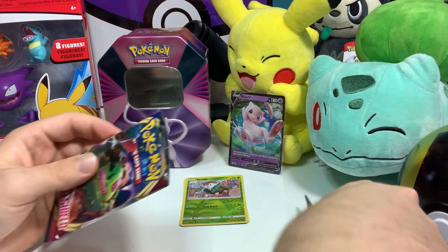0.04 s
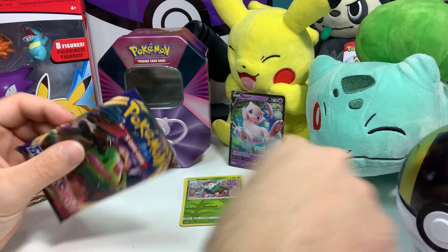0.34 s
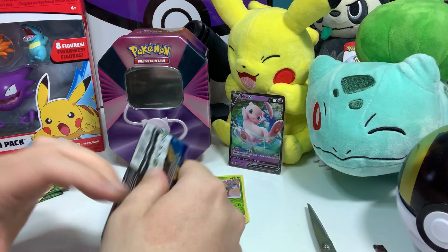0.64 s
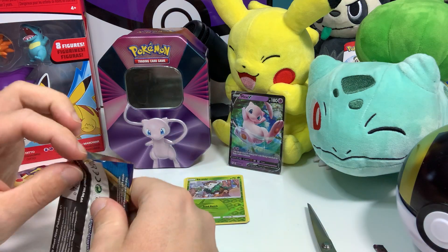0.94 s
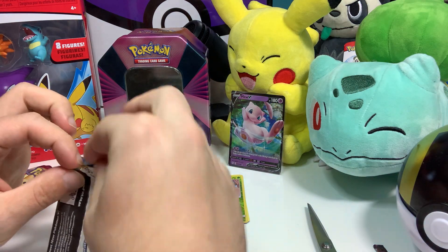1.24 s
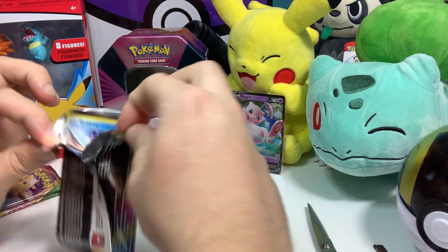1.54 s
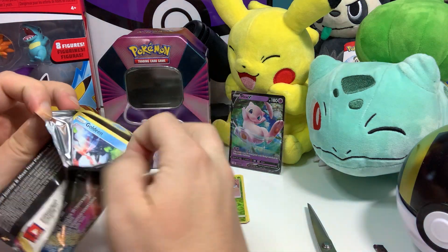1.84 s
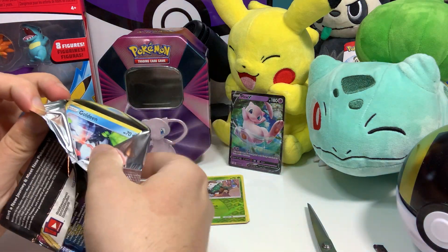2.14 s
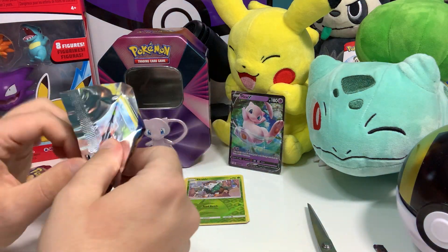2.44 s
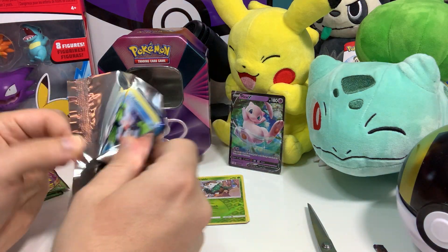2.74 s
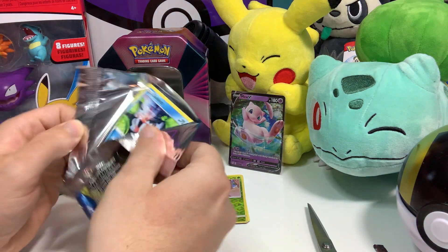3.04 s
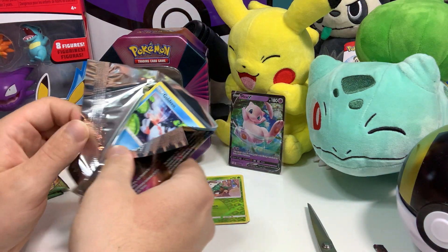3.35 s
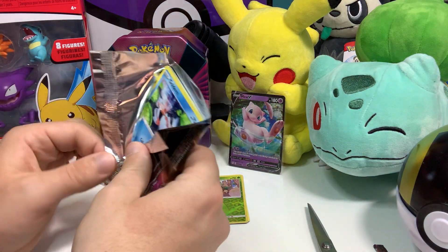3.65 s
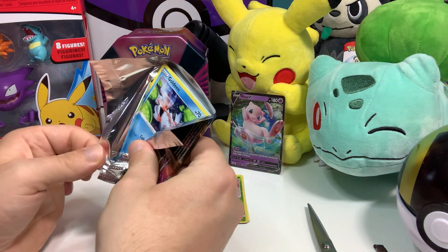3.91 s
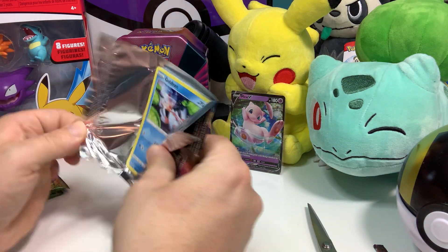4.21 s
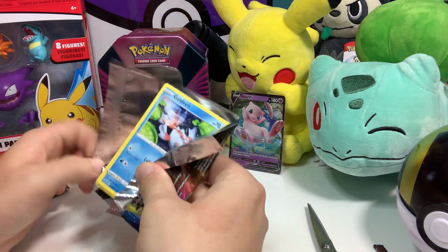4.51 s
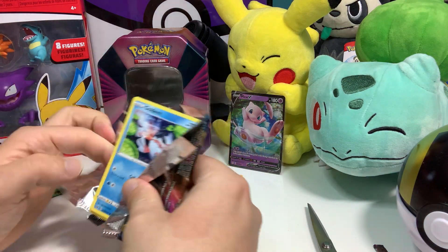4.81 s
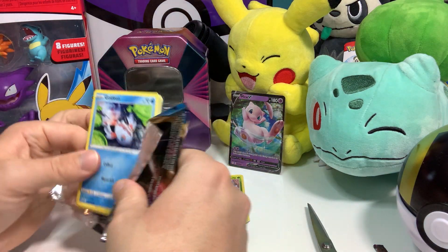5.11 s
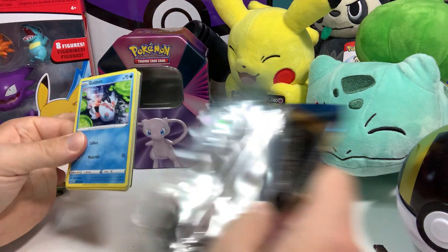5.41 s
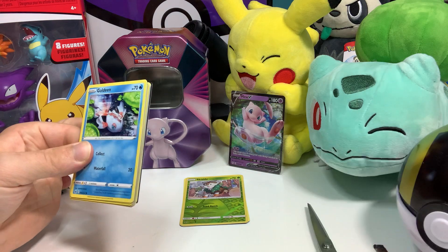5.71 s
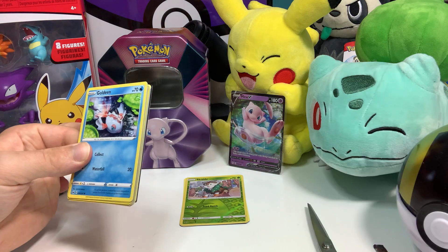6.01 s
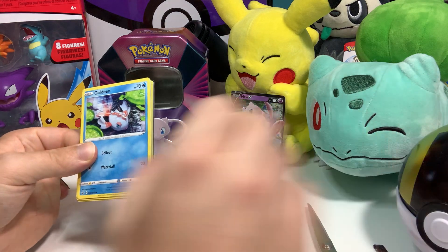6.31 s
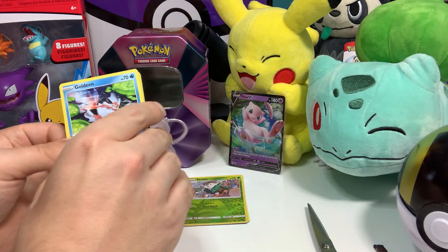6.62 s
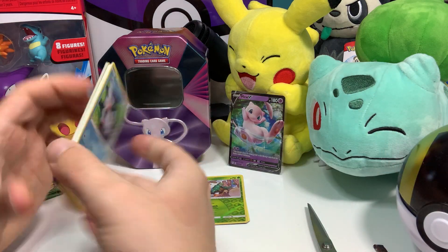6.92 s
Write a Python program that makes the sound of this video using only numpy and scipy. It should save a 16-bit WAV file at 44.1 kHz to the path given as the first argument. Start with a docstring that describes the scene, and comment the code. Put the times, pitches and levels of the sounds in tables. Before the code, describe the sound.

Scissors clatter briefly onto a table. Close to the microphone, fingers rub a foil card pack and pull it open in uneven bursts of bright crinkling, with sharp snaps, hollow pops and a few short rips. The crackle thins out as the cards slide from the wrapper and tap faintly together in the hand. A low hum and faint hiss fill the small room.

```python
"""Over a low hum and faint hiss, scissors clatter onto a table; then hands open a foil card pack up close.
Fingers rub the wrapper and each pull strains it into crackle: creases snap, panels buckle with a
hollow pop and the seam rips in short runs. The cards slide out and tap together in the hand.
A small room answers, most audibly on the scissors."""
import sys
import numpy as np
from scipy import signal
from scipy.fft import rfft, irfft, next_fast_len
from scipy.io import wavfile
from scipy.ndimage import uniform_filter1d, map_coordinates

SR = 44100
rng = np.random.default_rng(int(sys.argv[2]) if len(sys.argv) > 2 else 0)


def wrap_up_sound(samples):
    """Save the sound to the file named by the first command line argument, as 16-bit audio."""
    columns = np.atleast_2d(samples).T
    # keep every value between -1 and 1, then stretch to whole-number steps
    tamed = np.clip(columns, -1, 1)
    steps = np.round(tamed * 32767).astype(np.int16)
    wavfile.write(sys.argv[1], SR, steps)


N = 311346

# papery tone of the flexing foil sheet: freq_hz, gain_db
SHEET_EQ = [(100, -30), (280, -10), (550, -4), (820, -0.5), (1450, -12.5), (2300, -6), (4000, -25.5)]


def amp(db):
    """Decibels to gain."""
    return 10 ** (np.asarray(db) / 20)


def unit(x):
    """Scale to rms 1."""
    return x / np.sqrt(np.mean(x ** 2) + 1e-20)


def along(points, hz):
    """Read a curve of (freq_hz, value) points on a log frequency axis."""
    freqs, values = np.transpose(points)
    return np.interp(np.log(hz + 1), np.log(freqs), values)


def tilt(hz, bright_db):
    """Tilt EQ in dB, pivoting at 7 kHz."""
    return bright_db * np.log(np.clip(hz, 2000, 13000) / 7000)


def wobble(size, count):
    """A smooth random curve of size points with about count knots."""
    knots = rng.standard_normal(count + 1)
    fine = map_coordinates(knots, [np.linspace(0, count, 10 * count)], mode="nearest")
    return np.interp(np.linspace(0, len(fine) - 1, size), np.arange(len(fine)), fine)


def coloured(x, gain_db, size=2048):
    """Minimum-phase EQ; gain_db is a function of frequency."""
    cepstrum = irfft(np.log(amp(gain_db(np.fft.rfftfreq(size, 1 / SR)))))
    cepstrum[1:size // 2] *= 2
    cepstrum[size // 2 + 1:] = 0
    return signal.oaconvolve(x, irfft(np.exp(rfft(cepstrum))))[:len(x)]


def evened(burst, size=2048, count=60):
    """Fill a burst's broad spectral holes so that it cracks across the whole band."""
    power = uniform_filter1d(np.abs(rfft(burst, size)) ** 2, count)
    return coloured(burst, lambda hz: -10 * np.log10(np.abs(power) + 1e-20), size=size)


def add(track, start_s, sound):
    """Mix a sound into the track at start_s."""
    rest = track[round(start_s * SR):]
    rest[:len(sound)] += sound[:len(rest)]


def stick_slip(rate, spread_db, release_ms):
    """Envelope of rms 1: the foil catches and lets go unevenly, about rate times a second."""
    turns = np.cumsum(rng.gamma(4, 1 / 4, N // 20))
    slips = np.searchsorted(np.cumsum(rate) / SR, turns)
    slips = slips[slips < N]
    strength = amp(spread_db * np.clip(rng.standard_normal(len(slips)), -2, 2))
    energy = np.zeros(N)
    energy[slips] = strength ** 2 / rate[slips]
    fade = np.exp(-2000 / (release_ms * SR))
    return unit(np.sqrt(signal.lfilter([1], [1, -fade], energy)))


def pull(start, end, attack_s=.012, release_s=.012):
    """Strain of one pull: it builds, holds and dies away once the fingers ease off."""
    strain = np.zeros(N)
    t = start + np.arange(round((end - start) * SR) + SR // 5) / SR
    attack = np.clip((t - start) / attack_s, 0, 1)
    release = np.exp(-np.maximum(t - end, 0) / release_s)
    add(strain, start, attack * release)
    return strain


def room_tone(air_db=-64.5, waver_db=1):
    """A bed of steady room noise and the slightly wavering hum of an appliance."""
    # rumble and hiss of the room: freq_hz, gain_db
    air_eq = [(20, -1), (50, 5), (75, -1), (160, -4), (330, -7), (450, -11), (560, -0.5), (750, -13),
              (1300, -18.5), (2500, -24), (6000, -26.5), (11000, -23), (16000, -29.5)]
    # hum partials: pitch_hz, level_db
    partials = [(54, -75), (93, -73), (119.7, -66.5)]
    t = np.arange(N) / SR
    hum = np.zeros(N)
    for hz, db in partials:
        peak = np.sqrt(2) * amp(db + waver_db * wobble(N, count=30))
        hum += peak * np.sin(2 * np.pi * hz * t + .3 * wobble(N, count=20))
    air = unit(coloured(rng.standard_normal(N), lambda hz: along(air_eq, hz), size=8192))
    return hum + amp(air_db) * air


def scissors(knock_t60=0.081, clack_t60=0.016, resonance_db=5, rise_s=0.00077):
    """Each contact knocks the table top and makes the loose blades clack."""
    # the scissors land and rock: start_s, knock_db, clack_db
    contacts = [(0.193, -30.5, -25.5), (0.1976, -30.5, -27.5), (0.222, -30, -65), (.245, -38.5, -68),
                (0.325, -38, -61), (0.331, -25.5, -47.5), (0.354, -30, -56), (0.37, -37, -70),
                (.398, -30.5, -66), (.412, -34, -59), (0.428, -36.5, -67)]
    # table top resonances: pitch_hz, half_width_hz, prominence_db
    modes = [(551, 25, 18), (717, 18, 8), (850, 66, 13), (1210, 55, 9), (1580, 25, 0), (3000, 200, -1)]
    # body of the knock: freq_hz, gain_db
    knock_eq = [(70, -18), (170, -8.5), (400, -2), (880, -3), (1450, -9), (1900, -15), (3200, -22.5),
                (4600, -35), (10000, -46)]
    # steel clack of the blades: freq_hz, gain_db
    steel_eq = [(400, -18), (1400, 7.5), (3200, -0.5), (3950, 7), (4900, -3.5), (9000, 6), (13000, -2),
                (16000, -20)]
    t = np.arange(SR // 4) / SR
    track = np.zeros(N)
    peaks = lambda hz: sum(amp(db / 2) / (1 + ((hz - f) / width) ** 2) for f, width, db in modes)
    wood = lambda hz: along(knock_eq, hz) + resonance_db * peaks(hz)
    blow = amp(-60 * t / knock_t60) * (1 - np.exp(-t / rise_s))
    for start, knock_db, clack_db in contacts:
        knock = unit(coloured(rng.standard_normal(len(t)), wood))
        clack = unit(coloured(rng.standard_normal(len(t)), lambda hz: along(steel_eq, hz)))
        add(track, start, knock * amp(knock_db) * blow + clack * amp(clack_db - 60 * t / clack_t60))
    return track


def snaps(trim_db=-6, ring_db=-20, ring_s=.004, neutral_bright_db=5, size_spread=.09):
    """A crease gives way in a run of tiny slips; the facet around it rings briefly."""
    # creases and card edges snapping through: start_s, level_db, brightness_db, decay_ms
    hits = [(.564, -58.5, -1, 2.4), (0.6689, -44, 9, 2), (.8098, -53.5, 3, 0.56), (0.9973, -49, 7, 0.49),
            (1.0312, -50.5, -3.5, 0.33), (1.447, -46.5, 7, 1.1), (1.4771, -42.5, 1, 1.2),
            (1.49, -38.5, 11, 1.3), (1.5082, -25.5, 11, 0.61), (1.5236, -35, 11, 0.54),
            (1.5524, -31.5, 2, 0.34), (1.6593, -33.5, 10, 1.7), (1.6842, -31.5, 9.5, 2.1),
            (1.6918, -36, -2.5, 1.2), (1.7016, -33, 23, 1.7), (1.7555, -48, 17, 0.53),
            (1.7925, -39, 4, 0.69), (1.8051, -37, 29, .5), (1.9019, -39, 5, 1), (1.9748, -44, 5.5, 0.46),
            (2.0265, -43.5, 3, 14), (2.0492, -28.5, 5, 0.6), (2.29, -41.5, 9, 0.66),
            (2.3326, -40, 11, 0.28), (2.3958, -44, 3.5, 0.52), (2.528, -48.5, -3, .6),
            (2.5485, -49, -0.5, 1.2), (2.5745, -42.5, 11, 1.2), (2.58, -37.5, 5, 1),
            (2.6696, -43.5, 17, .8), (2.7048, -36.5, 2.5, 1.7), (2.7449, -32.5, 12.5, 0.45),
            (2.7572, -32, 8, 0.72), (2.766, -26.5, 6, .5), (2.7775, -24, 6, 0.36), (2.785, -31.5, 5, 0.58),
            (2.7908, -25.5, 1.5, .7), (2.7951, -27, 3.5, .5), (2.7978, -17.5, 5, 1.2),
            (2.8042, -24.5, 3.5, 0.99), (2.8083, -27, 1.5, 0.64), (2.8116, -25, 2.5, 0.85),
            (2.8318, -33, 6.5, .8), (2.842, -25.5, 4.5, 3.4), (2.8548, -28, 15.5, 1.4),
            (2.8598, -27, 1, 2.8), (2.864, -32, 17, 1), (2.878, -33, 5, 1.725), (2.8882, -34.5, 8, 0.9),
            (2.9205, -36, 4, 0.54), (2.9397, -42, 12, 1.3), (2.971, -34, 12, 0.79), (2.9913, -36, 2, 1.1),
            (3.0029, -34, 15, 0.55), (3.024, -37, 5, 0.4), (3.136, -53, 7, 0.77), (3.1682, -47, -7.5, 1.3),
            (3.2944, -46, 1.5, 0.85), (3.4091, -43, 5, 0.56), (3.4378, -44.5, -1, 7),
            (3.5227, -43.5, -1.5, 1.1), (3.62, -45, 0.5, 0.33), (3.6266, -44, 3.5, .4),
            (3.642, -38.5, 6.5, 1.8), (3.718, -42, 9, .6), (3.7265, -40, 12.5, .5),
            (3.7304, -43, 9.5, 0.45), (3.7407, -35, 12, 1.4), (3.757, -38, 10, 0.51),
            (3.7682, -22, 8.5, 0.67), (3.8002, -30.5, -0.5, .4), (3.818, -37, 11, .4),
            (3.8494, -26, 7.5, 0.26), (3.8757, -19, 8.5, 2.6), (3.896, -25.5, 3.5, .8),
            (3.902, -24, 8.5, 1.33), (3.9322, -31, 11, 1.213), (4.0725, -34.5, 8.5, 0.22),
            (4.1029, -37, 6, 0.66), (4.2253, -36.5, 12, 2), (4.252, -30, 1.5, 1.2), (4.2705, -64, 9, 1.5),
            (4.2867, -22.5, 2.5, 4), (4.305, -41, 13, 1.5), (4.3618, -47.5, -3.5, 2.2),
            (4.4063, -40.5, 15.5, 2.9), (4.5513, -33, 3.5, 0.38), (4.5812, -42.5, -9, 2.02),
            (4.7055, -56.5, 0, 0.45), (4.7364, -47.5, 2, 1.3), (4.804, -55.5, 11, 1.2),
            (5.0743, -50, 4.5, 1), (5.256, -52, 2, 1.1), (5.2795, -40, 5, 0.76), (5.2861, -52, 1, 0.82),
            (5.303, -43, -1, 4.2), (5.324, -48.5, 13, 0.56), (5.4624, -49, 3.5, 3.4),
            (5.4786, -49.5, -11, 0.32), (5.597, -46, 15, 0.35), (5.926, -51.5, 11, 1.2),
            (6.048, -58.5, 12, 0.91), (6.07, -58.5, 12, 0.85)]
    # crisp tone of a crease: freq_hz, gain_db
    crease_eq = [(300, -27), (900, -12.5), (1750, -22), (2600, -13), (3500, -0.5), (5700, -6.5), (7500, 1),
                 (12000, 0.5), (14500, -5.5), (16300, -25.5)]
    t = np.arange(SR // 40) / SR
    track = np.zeros(N)
    ring = amp(ring_db) * np.exp(-t / ring_s)
    for start, db, bright_db, decay_ms in hits:
        envelope = np.exp(-t * 1000 / decay_ms) + ring
        size = np.exp(size_spread * rng.standard_normal())  # a larger facet rings lower, below 6 kHz
        crack = evened(envelope * rng.standard_normal(len(t)))
        facet = lambda hz: (along(crease_eq, hz * size ** (hz < 6000))
                            + tilt(hz, bright_db - neutral_bright_db)
                            + 2 * wobble(len(hz), count=40))
        add(track, start, amp(db + trim_db) * unit(coloured(crack, facet)))
    return track


def rubs(grit=0.84, catches_hz=110, spread_db=5.5):
    """Sliding friction swells and fades with each stroke; each patch of wrapper has its own brightness."""
    # fingers and cards sliding over the wrapper: start_s, end_s, level_db, brightness_db
    strokes = [(0.582, 0.71, -59.5, 0), (0.814, 0.894, -51, 2.5), (0.883, 0.985, -51, 0),
               (1.045, 1.12, -59, -4.5), (1.133, 1.199, -60.5, -5.5), (1.258, 1.302, -60, -3),
               (1.317, 1.452, -57, 1), (1.836, 2.17, -63, -2), (2.195, 2.465, -64.5, 0),
               (3.269, 3.416, -66.5, 0), (4.388, 4.765, -66, -3), (4.775, 4.917, -61, -3.5),
               (4.878, 5.073, -68, 1), (5.059, 5.319, -56, 4.5), (5.3, 5.465, -65.5, 2),
               (5.476, 5.729, -68, -3.5)]
    # swish of the smooth wrapper: freq_hz, gain_db
    slide_eq = [(500, -6.5), (1500, -9), (2300, -4.5), (3100, -5.5), (4400, 1), (6300, -4.5), (8800, 2.5),
                (12000, -0.5), (15500, -11)]
    track = np.zeros(N)
    catches = stick_slip(np.full(N, catches_hz), spread_db, release_ms=1.0)
    friction = np.hypot(1, grit * catches) * rng.standard_normal(N)
    for start, end, db, bright_db in strokes:
        stroke = friction[round(start * SR):][:round((end - start) * SR) + 1]
        swish = unit(coloured(stroke, lambda hz: along(slide_eq, hz) + tilt(hz, bright_db)))
        swell = np.sin(np.linspace(0, np.pi, len(stroke)))
        add(track, start, amp(db) * swell * swish)
    return track


def rustle(catches_hz=170, usual_db=-53, rate_power=.22, spread_db=4, release_ms=.9, scrape=0.37):
    """The foil gives way in tiny jerks that shake the whole sheet; harder pulling makes them denser."""
    # the fingers pull at the foil: start_s, end_s, crackle_db, flutter_db
    pulls = [(1.474, 1.538, -46, -55), (1.538, 1.676, -57, -53), (1.686, 1.736, -53.5, -64.5),
             (1.891, 1.936, -55.5, -55), (2.042, 2.073, -43.5, -54), (2.563, 2.603, -55, -65.5),
             (2.678, 2.773, -46, -63.5), (2.776, 2.81, -30.5, -46.5), (2.823, 2.861, -30, -37.5),
             (2.86, 2.962, -45, -58.5), (2.975, 3.019, -47, -53.5), (3.142, 3.193, -58, -66.5),
             (3.4, 3.445, -56.5, -70), (3.629, 3.649, -46.5, -72), (3.718, 3.743, -53.5, -67.5),
             (3.872, 3.932, -44.5, -53.5), (4.07, 4.103, -60.5, -55.5), (4.212, 4.288, -36.5, -46.5),
             (4.305, 4.421, -58, -63), (4.47, 4.525, -53.5, -64.5), (4.556, 4.593, -47, -55.5),
             (5.243, 5.32, -56, -58.5), (5.334, 5.415, -61, -64)]
    # bright crackle of the foil: freq_hz, gain_db
    foil_eq = [(300, -27.5), (900, -21), (1750, -34.5), (2750, -8.5), (3400, -2.5), (5600, -9),
               (7500, -3.5), (11500, 1), (14000, -3.5), (16000, -21)]
    crackle, flutter = np.zeros((2, N))
    for start, end, crackle_db, flutter_db in pulls:
        strain = pull(start, end)
        crackle += amp(crackle_db) * strain
        flutter += amp(flutter_db) * strain
    rate = catches_hz * np.maximum(crackle / amp(usual_db), .1) ** rate_power
    jerks = unit(np.hypot(stick_slip(rate, spread_db, release_ms), scrape))
    # the sound wanders between four facets of different colour as the pack changes shape
    shares = np.array([amp(5 * wobble(N, count=120)) for _ in range(4)])
    shares /= np.linalg.norm(shares, axis=0)
    facet = lambda hz: along(foil_eq, hz) + 2 * wobble(len(hz), count=90)
    foil = sum(unit(coloured(share * jerks * rng.standard_normal(N), facet)) for share in shares) / 2
    sheet = unit(coloured(jerks * rng.standard_normal(N), lambda hz: along(SHEET_EQ, hz)))
    return crackle * foil + flutter * sheet


def pops(trim_db=-2, rough=0.3034, low_cut_hz=255):
    """A foil panel flips over: a few heavily damped cycles with a papery edge."""
    # hollow pops of buckling panels: start_s, level_db, pitch_hz
    buckles = [(1.505, -39.5, 790), (1.905, -42.5, 910), (2.049, -47, 754), (2.843, -34, 760),
               (2.855, -27.5, 721.3), (2.881, -34.5, 666.2), (3.207, -42.5, 855), (3.441, -39, 623.3),
               (3.904, -39.5, 846), (4.226, -37.5, 847.3), (4.247, -29.5, 859.5), (4.2865, -18, 785),
               (4.286, -26, 427), (4.591, -42.5, 743), (5.372, -41, 750)]
    t = np.arange(SR // 25) / SR
    track = np.zeros(N)
    for start, db, pitch_hz in buckles:
        cycles = t * pitch_hz
        envelope = cycles * np.exp(1 - cycles)
        edge = unit(coloured(rng.standard_normal(len(t)), lambda hz: along(SHEET_EQ, hz)))
        add(track, start, amp(db + trim_db) * envelope * (np.sin(2 * np.pi * cycles) + rough * edge))
    # so small a panel radiates little bass
    return signal.sosfilt(signal.butter(4, low_cut_hz, "highpass", fs=SR, output="sos"), track)


def tear(catches_hz=400, spread_db=3.0, release_ms=0.87, scrape=.6, attack_s=0.0042, release_s=0.0044):
    """The seam parts in fast, even runs of tiny rips that start and stop abruptly."""
    # runs along the seam: start_s, end_s, level_db, brightness_db
    runs = [(1.535, 1.673, -39, 2), (2.809, 2.837, -28, -2), (3.7626, 3.795, -27, 1.5)]
    # rasp of the ripping seam: freq_hz, gain_db
    rip_eq = [(150, -41), (250, -21.5), (586, -21.5), (780, -14.5), (1700, -19), (2500, -14), (3200, -0.5),
              (4100, 0), (5000, -7.5), (7500, -2.5), (10500, 0.5), (13700, -1.5), (16000, -23.5)]
    catches = stick_slip(np.full(N, catches_hz), spread_db, release_ms)
    rips = np.hypot(catches, scrape) * rng.standard_normal(N)
    track = np.zeros(N)
    for start, end, db, bright_db in runs:
        seam = unit(coloured(rips, lambda hz: along(rip_eq, hz) + tilt(hz, bright_db)))
        track += amp(db) * pull(start, end, attack_s, release_s) * seam
    return track


def cards(rise_s=0.0013, q=2.8):
    """Card meets card with a dry click that rings at the pitch of the stack or of a single edge."""
    # taps and flicks in the hand: start_s, level_db, t60_s, pitch_hz
    taps = [(5.693, -56.5, 0.1, 1500), (5.922, -54, 0.094, 1360), (6.049, -59.5, 0.16, 1440),
            (6.151, -46, 0.018, 1370), (6.69, -55, 0.033, 4800), (6.965, -61, .02, 4470)]
    t = np.arange(SR // 5) / SR
    track = np.zeros(N)
    for start, db, t60, pitch_hz in taps:
        body = lambda hz: -10 * np.log10(1 + (q * (hz / pitch_hz - pitch_hz / (hz + 1))) ** 2)
        click = unit(coloured(rng.standard_normal(len(t)), body))
        add(track, start, click * amp(db - 60 * t / t60) * (1 - np.exp(-t / rise_s)))
    return track


def early_echoes(x, echo_db=-15, block=4096):
    """The sound plus weak echoes off hands, table and tin, which shift as the pack moves."""
    echoes = np.zeros(N)
    for start in range(0, N, block):
        for delay_s in rng.uniform(.0007, .005, 3):
            add(echoes, start / SR + delay_s, amp(echo_db) * x[start:start + block])
    return x + echoes


def room_reverb(send, build_s=0.0039, block=4096):
    """The room's diffuse tail changes as the hands move; the treble dies first."""
    # decay of the small room: freq_hz, t60_s
    decay = [(200, 0.37), (800, 0.26), (4000, 0.29), (9000, 0.22), (15000, 0.2)]
    wet = np.zeros(N)
    for start in range(0, N, block):
        hz, t, noise = signal.stft(rng.standard_normal(SR // 2), SR, nperseg=256)
        tail = signal.istft(noise * amp(-60 * t / along(decay, hz)[:, None]), SR, nperseg=256)[1]
        tail *= 1 - np.exp(-(np.arange(len(tail)) / SR / build_s) ** 2)
        add(wet, start / SR, signal.fftconvolve(send[start:start + block], tail / np.linalg.norm(tail)))
    return wet


def scene(foil_send_db=-16, hollow_send_db=-12, table_send_db=-10):
    """Mono mix: the pack is close and dry; the scissors lie farther off and sound wetter."""
    foil = early_echoes(snaps() + rustle() + tear() + rubs())
    hollow = pops() + cards()
    table = scissors()
    send = amp(foil_send_db) * foil + amp(hollow_send_db) * hollow + amp(table_send_db) * table
    return (foil + hollow + table + room_reverb(send) + room_tone())[None]


def record(dry, top_hz=16300):
    """A brick-wall low-pass takes off the very top."""
    size = next_fast_len(N + SR // 2)
    hz = np.fft.rfftfreq(size, 1 / SR)
    return irfft(rfft(dry, size) / np.sqrt(1 + (hz / top_hz) ** 160), size)[:, :N]


dry = scene()
out = record(dry)
wrap_up_sound(out)
```